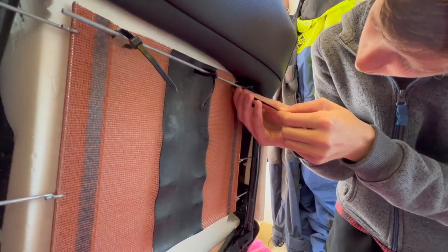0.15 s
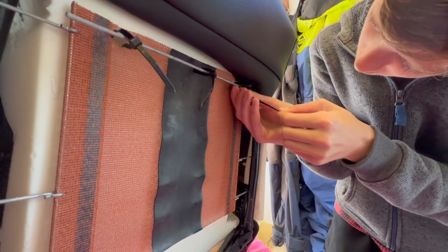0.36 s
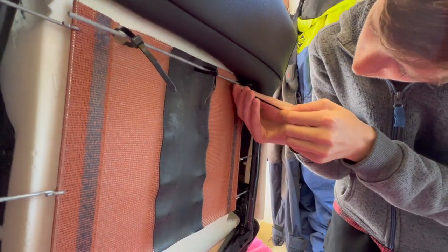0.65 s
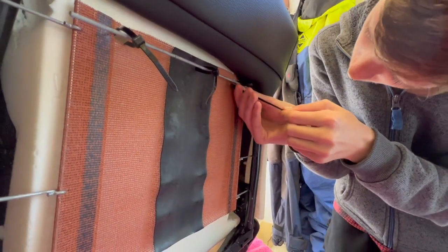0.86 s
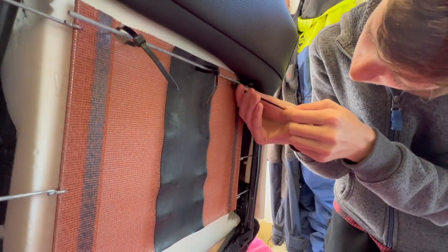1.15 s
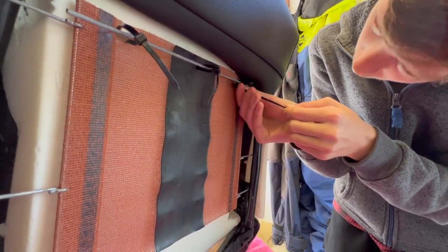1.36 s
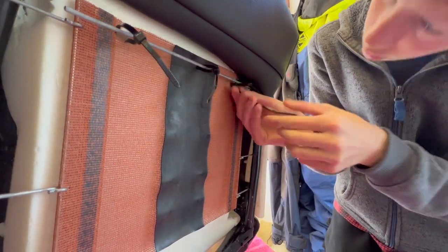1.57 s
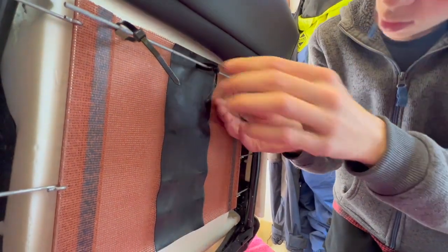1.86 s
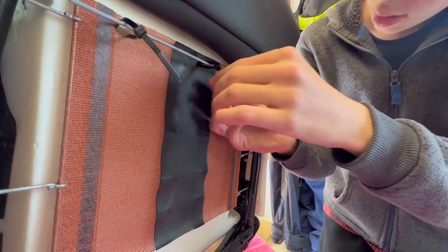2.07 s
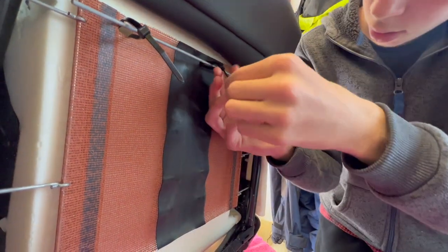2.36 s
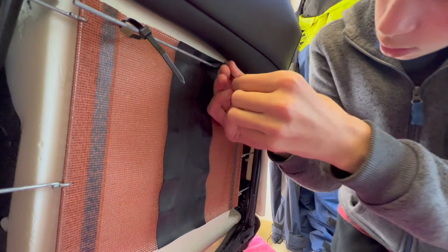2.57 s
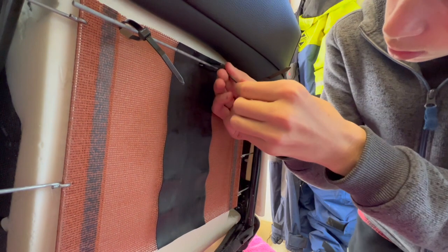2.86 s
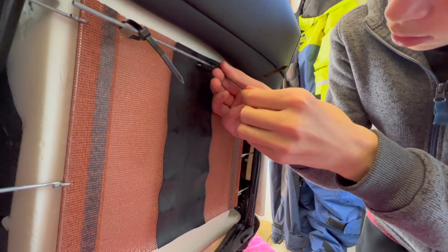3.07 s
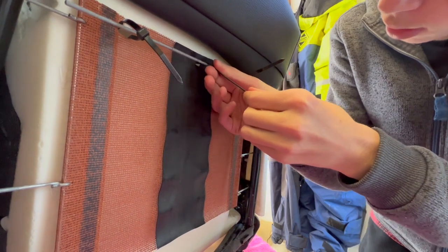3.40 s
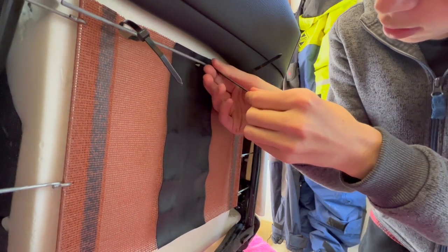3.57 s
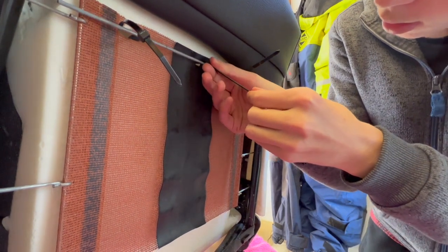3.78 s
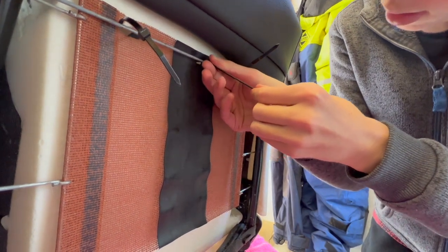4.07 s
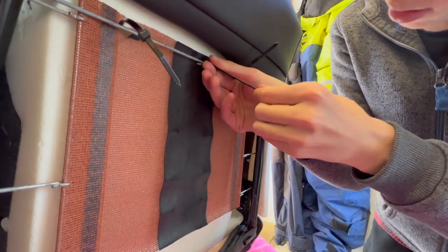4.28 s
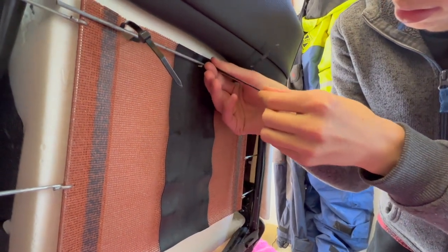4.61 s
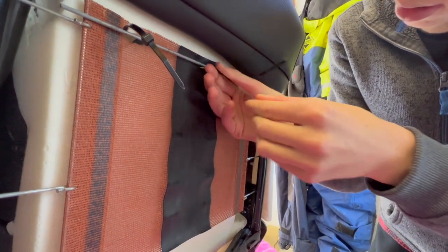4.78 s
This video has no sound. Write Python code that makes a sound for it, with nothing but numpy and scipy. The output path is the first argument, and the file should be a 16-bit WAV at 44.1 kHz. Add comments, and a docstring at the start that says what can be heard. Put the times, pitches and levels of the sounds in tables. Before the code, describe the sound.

Inside a small, short-echoing vehicle cabin, a phone close to the hands hears a nylon cable tie tighten on a seat frame. Low rumble is strongest at the start, then drops under faint hiss. Quick bursts of sharp, bright plastic clicks come at 0.0, 0.16, 0.35 and 0.56 s, each with a small frame knock, followed by single clicks at 0.8, 0.9, 1.0 and 1.2 s. From 1.5 to 2.45 s a hand makes soft thuds and grainy brushes, strongest near 2.0 and 2.4 s. A distant bird whistles faintly and echoes between 1.2 and 3.5 s. A second tie gives four separate clicks from 2.7 s, then a rapid ratcheting run from 2.9 to 3.6 s, fastest near 3.0 s, with a fuzzy squeak early on. It slows into harder, spaced snaps until 4.0 s, fading to tiny clicks by 4.5 s. Light touches and slightly rising rumble finish it.

```python
"""Over a low cabin rumble, short clicking tugs tighten a nylon cable tie on a car seat frame, near a phone.
Each tooth snaps the pawl (an impulse and brief ringing), cracks the strap and knocks the frame's modes.
A hand then brushes the seat (grainy filtered noise) and a far bird whistles (gliding, echoed sines).
A second tie follows: single teeth, a long run that slows as it bites, with a fuzzy squeak, then last teeth."""
import sys
import numpy as np
from scipy import signal
from scipy.fft import rfft, irfft
from scipy.io import wavfile
from scipy.ndimage import uniform_filter1d

SR = 44100
rng = np.random.default_rng(int(sys.argv[2]) if len(sys.argv) > 2 else 0)


def store_pcm(level_fs):
    """Save levels as 16-bit WAV."""
    pcm = np.round(np.clip(level_fs, -1, 1) * 32767).astype(np.int16)
    wavfile.write(sys.argv[1], SR, np.atleast_2d(pcm).T)


N = 218189
SIZE, LEAD = 4096, 256  # samples in one blow, samples before its attack
T = (np.arange(SIZE) - LEAD) / SR  # s from the attack


def amp(db):
    """Decibels to gain."""
    return 10 ** (np.asarray(db) / 20)


def evened(x):
    """Scales to rms 1."""
    return x / np.sqrt(np.mean(x ** 2) + 1e-20)


def blow(x, db):
    """Scales the energy of a short sound to that of 10 ms at rms level db."""
    return amp(db) * evened(x) * np.sqrt(0.01 * SR / SIZE)


def read(points, hz):
    """Reads a spectrum table on a log-frequency axis."""
    f, value = np.transpose(points)
    return np.interp(np.log(hz + 1), np.log(f + 1), value)


def curve(points, t):
    """Reads a control curve at the times t."""
    return np.interp(t, *np.transpose(points))


def bins(x):
    """Frequencies of the spectrum of x, in Hz."""
    return np.fft.rfftfreq(x.shape[-1], 1 / SR)


def colour(x, points):
    """Filters x by a table of (Hz, dB)."""
    return irfft(rfft(x) * amp(read(points, bins(x))), x.shape[-1])


def add(mix, s, sound):
    """Mixes in a blow whose attack falls at s seconds."""
    at = round(s * SR) - LEAD
    part = mix[..., max(at, 0):at + SIZE]
    part += sound[..., max(-at, 0):][..., :part.shape[-1]]


def dying(t60):
    """Envelope of a free decay, t60 in seconds."""
    return (T >= 0) * amp(-60 * abs(T) / t60)


def burst(t60):
    """A puff of dense ringing (decaying noise) with energy 1."""
    x = rng.standard_normal(SIZE) * dying(t60)
    return x / np.linalg.norm(x)


# Left-right likeness of diffuse sound. Each row: frequency in Hz, likeness 0-1.
LIKENESS = [(30, .92), (250, 0.79), (1000, 0.067), (4000, 0.13), (12000, 0.24)]


def diffuse(pair):
    """Makes two unrelated signals alike in the bass, as at two close microphones."""
    a, b = rfft(pair)
    same = np.clip(read(LIKENESS, bins(pair)), 0, 1)
    right = same * a + np.sqrt(1 - same ** 2) * b
    return irfft(np.array([a, right]), pair.shape[-1])


# Spectrum of the background. Each row: frequency in Hz, relative level in dB.
FLOOR_COLOUR = [(20, -4.5), (35, -4), (90, 0), (150, -6), (250, -13.5), (400, -20), (700, -23), (1000, -28),
                (2000, -29.5), (3200, -36), (6000, -40), (9000, -39), (10500, -49), (14500, -37)]
# Level of the rumble. Each row: time in seconds, level in dB before the trim.
RUMBLE_LEVEL = [(0, -46), (.6, -59), (1.6, -59.5), (3.2, -58), (4.4, -57.5), (4.95, -54)]


def background(split_hz=140, rumble_trim_db=2.5, hiss_db=-61.5):
    """Noise: low rumble, strongest in the first tugs, then quiet, rising a little at the end; steady hiss."""
    noise = colour(diffuse(rng.standard_normal((2, N))), FLOOR_COLOUR)
    low = irfft(rfft(noise) / (1 + (bins(noise) / split_hz) ** 8), N)
    rumble = evened(low) * amp(curve(RUMBLE_LEVEL, np.arange(N) / SR) + rumble_trim_db)
    hiss = evened(noise - low) * amp(hiss_db)
    return rumble + hiss


MIC_LEAD_S = 0.000074  # half the delay between the two microphones


def sides(x, right_db=0, lead_s=MIC_LEAD_S):
    """Sound from the hands reaches the right microphone first."""
    lead = np.exp(2j * np.pi * bins(x) * lead_s)
    return irfft(rfft(x) * np.array([1 / lead, lead * amp(right_db)]), SIZE)


def microphones(x, boost_db, hz=8800, width_hz=880):
    """The port of the right microphone rings at one high pitch: a narrow boost."""
    port = amp(boost_db * np.exp(-((bins(x) - hz) / width_hz) ** 4))
    right = irfft(rfft(x[1]) * port, SIZE)
    return sides(np.array([x[0], right]))


def snap(points, ring, ring_t60, scatter=1.0):
    """The pawl lands: one impulse, then brief ringing of the head, a little different at each side."""
    common = burst(ring_t60)
    separate = np.array([burst(ring_t60), burst(ring_t60)])
    pair = (common + scatter * separate) / np.hypot(1, scatter)
    swelling = 1 - dying(ring_t60 / 10)
    return colour((T == 0) + ring * pair * swelling, points)


def varied(points, vary_db=1.0):
    """Each tooth catches the pawl a little differently, which recolours its crack."""
    hz, db = np.transpose(points)
    return np.transpose([hz, db + vary_db * rng.standard_normal(len(hz))])


def knock(modes, detune=0.031, muddle=0.5, bass_db=0, bass_hz=400, vary_db=1.0):
    """Damped modes struck by a tooth; the gripping fingers shift them slightly."""
    hz, db, t60 = np.transpose(modes)[:, :, None]
    turn = 2 * np.pi * hz * (1 + detune * rng.standard_normal(hz.shape)) * T
    level_db = db + bass_db * (hz < bass_hz) + vary_db * rng.standard_normal(hz.shape)
    rings = amp(level_db) * dying(t60) * np.exp(1j * turn)
    # alternate signs, then a random phase for each mode and side
    signs = (-1) ** np.arange(len(modes))
    heard = signs * np.exp(1j * muddle * rng.standard_normal((2, len(modes))))
    return (heard[:, :, None] * rings).sum(1).imag * (1 - dying(0.016))


def tension(tooth, fit):
    """The strap takes up its slack, then tightens with every tooth until taut; limited to 0-1."""
    slack_teeth, biting_teeth, loose, taut = fit
    bite = np.clip((tooth - slack_teeth) / biting_teeth, 0, 1)
    return np.clip(loose + (taut - loose) * bite, 0, 1)


# Tugs on the first tie. Each row: start in seconds, length in seconds, number of teeth,
# mean snap level in dB, knock level in dB.
FIRST_TUGS = [(0.0078, 0.0237, 3, -22, -31.5), (0.1561, 0.1143, 8, -21, -35.5),
              (0.3548, 0.0799, 4, -19.5, -35), (0.5606, 0.0473, 3, -22, -38.5), (0.7901, 0, 1, -23.5, -46),
              (0.8906, 0, 1, -25.5, -46), (0.9934, 0, 1, -23, -44.5), (1.1826, 0, 1, -25, -46.5)]
TUG_PEAK, TUG_EASE = 0.417, 1.58  # share of the way where a tug is fastest, slowing towards its ends


def first_teeth():
    """Every tug gathers speed and stalls again; one row a tooth: (s, snap dB, knock dB)."""
    rows = []
    for start, length, teeth, snap_db, knock_db in FIRST_TUGS:
        way = np.linspace(0, 1, round(teeth))
        lag = way + TUG_EASE * ((way - TUG_PEAK) ** 3 + TUG_PEAK ** 3)
        times = start + length * lag / max(lag[-1], 1)
        rows += [(s, snap_db, knock_db) for s in times]
    return rows


# Colour of the first pawl's snap. Each row: frequency in Hz, relative level in dB.
FIRST_SNAP_COLOUR = [(3000, -28), (6000, -12), (7500, -8.5), (8700, 2.5), (10300, -3), (11000, -17),
                     (12000, 3), (13200, -14.5), (14400, 3), (15600, -6), (16500, -21)]
# Colour of the first strap's crack. Each row: frequency in Hz, relative level in dB.
FIRST_CRACK_COLOUR = [(200, -13.5), (700, -4.5), (1050, 11), (1500, -17.5), (1850, 1), (2200, 14),
                      (3000, -2.5), (4000, 4.5), (5000, -9), (8000, -35.5)]
# Modes of the first strap when taut. Each row: frequency in Hz, relative level in dB, t60 in seconds.
STRAP_MODES = [(1533, 7, 0.0075), (2103, -9.5, 0.011)]
# Modes of the frame at the first tie. Each row: frequency in Hz, relative level in dB, t60 in seconds.
FIRST_FRAME_MODES = [(92, -2, 0.1), (160.8, -4.5, .11), (214, 1, 0.09), (293.5, 4.5, .065),
                     (393, -5.5, 0.023), (486, -1, 0.058), (580, 7, 0.02), (676, 8, 0.031), (832, 0, 0.02)]
# Tightening of the first tie: teeth of slack, further teeth until taut, then slack and taut tension
# before the 0-1 limit.
FIRST_TIGHTENING = (19, 2.1, 0.59, 1.7)


def first_tie(crack_db=-39.0, ring_db=-39.0, slack_ring_db=-15.5, taut_crack_db=-0.5,
              uneven_db=1.03, taut_treble_db=8, knock_delay_s=0.0017):
    """Short tugs on a tie whose head rings freely; once taut, snap brightens and strap rings more."""
    out = np.zeros((2, N))
    for tooth, (s, snap_db, knock_db) in enumerate(first_teeth()):
        pull = tension(tooth, FIRST_TIGHTENING)
        treble_db = (pull - 0.5) * taut_treble_db
        head = snap(FIRST_SNAP_COLOUR, ring=1.0, ring_t60=0.0033)
        head = colour(head, [(9600, 0), (10800, treble_db), (13000, treble_db), (15000, 0)])
        click = microphones(head, boost_db=12.5)
        add(out, s, blow(click, snap_db + uneven_db * rng.standard_normal()))
        crack = sides(snap(varied(FIRST_CRACK_COLOUR), ring=4.8, ring_t60=0.015), right_db=1.5)
        add(out, s, blow(crack, crack_db + pull * taut_crack_db))
        strap = sides(knock(STRAP_MODES, muddle=0.2, vary_db=5.7), right_db=4, lead_s=0.00004)
        add(out, s, blow(strap, ring_db + (1 - pull) * slack_ring_db))
        frame = knock(FIRST_FRAME_MODES, detune=0.047)
        add(out, s + knock_delay_s, blow(frame, knock_db))
    return out


# Decay of the cabin. Each row: frequency in Hz, t60 in seconds.
CABIN_DECAY = [(150, 0.26), (400, 0.2), (1000, 0.22), (3000, 0.17), (9000, 0.19), (15000, 0.19)]


def cabin(x, wet, first_echo_s=0.0018, early=0.57):
    """Roof and windows answer within a few milliseconds; the upholstery soon swallows the tail."""
    noise = diffuse(rng.standard_normal((2, SR // 2)))
    hz, t, z = signal.stft(noise, SR, nperseg=128)
    t60 = read(CABIN_DECAY, hz)[:, None]
    decay = amp(-60 * t / t60) * np.sqrt(2 * np.log(1000) / (t60 * SR))  # about energy 1 per band
    send = amp(read(wet, hz))[:, None]
    tail = signal.istft(z * decay * send, SR, nperseg=128)[1]
    t = np.arange(tail.shape[1]) / SR
    early_bump = early * np.exp(-((t - 0.0095) / 0.0066) ** 2)
    tail = tail * (np.minimum(t / first_echo_s, 1) + early_bump)
    return signal.fftconvolve(x, tail, axes=1)[:, :N]


STROKE_RISE_DB, STROKE_FADE_DB_PER_S = 35.5, 229


def stroke(s, rise_s, hold_s):
    """Envelope of a sliding touch: it swells until s, holds and fades."""
    t = np.arange(N) / SR - s
    swell_db = STROKE_RISE_DB * np.minimum(t / rise_s, 0)
    fade_db = STROKE_FADE_DB_PER_S * np.maximum(t - hold_s, 0)
    return amp(swell_db - fade_db)


# Colour of the rubbing. Each row: frequency in Hz, relative level in dB.
RUBBING_COLOUR = [(120, -6), (250, -2.5), (480, -8), (750, -8), (980, -7), (1350, -9.5), (2300, -7.5),
                  (3500, -10), (6000, -11.5), (8600, -9.5), (10700, -20.5), (13200, -12), (16000, -32)]
# Strokes over seat and strap. Each row: end of the rise in seconds, rise in seconds, hold in seconds,
# level in dB before the trim, boost of the fabric's scuff in dB.
HAND_STROKES = [(1.745, 0.27, 0.18, -59.5, 1.5), (1.969, 0.023, 0.028, -41.5, 9),
                (2.209, 0.12, 0.036, -52, 5.5), (2.392, 0.016, 0.021, -41, -2.5),
                (4.668, 0.025, 0.012, -68.5, 14), (4.944, 0.12, 0.02, -58, -8)]
# Fingers and the loose tail tap the seat. Each row: time in seconds, thud level in dB, tick level in dB,
# treble tilt of the tick in dB.
SEAT_TAPS = [(0.059, -58, -37.5, -2.5), (1.517, -48.5, -70, 9), (1.553, -53.5, -67, 4),
             (1.63, -78.5, -63.5, 7), (1.664, -57.5, -56.5, -15), (2.087, -52.5, -77, 0),
             (2.2265, -43, -43.5, 8), (2.432, -44, -75, 0), (4.672, -68, -61, 3), (4.879, -53.5, -60, 7.5)]


def hands(grain_db=1.5, catch_db=1.5, rub_trim_db=-1, scuff_hz=930, scuff_width_hz=160):
    """Grainy rubbing of skin and sleeve that catches and slips, and a few soft taps."""
    grains = evened(uniform_filter1d(rng.standard_normal(N), size=90))
    catches = evened(uniform_filter1d(rng.standard_normal(N), size=600))
    rough = diffuse(rng.standard_normal((2, N))) * amp(grain_db * grains + catch_db * catches)
    rub = evened(colour(rough, RUBBING_COLOUR))
    scuff = irfft(rfft(rub) * np.exp(-((bins(rub) - scuff_hz) / scuff_width_hz) ** 2), N)
    out = np.zeros((2, N))
    for s, rise_s, hold_s, db, scuff_db in HAND_STROKES:
        brush = rub + (amp(scuff_db) - 1) * scuff
        out += brush * amp(db + rub_trim_db) * stroke(s, rise_s, hold_s)
    for s, thud_db, tick_db, treble_db in SEAT_TAPS:
        thud = colour(burst(0.088), [(50, -22), (130, -6.0), (230, 0.0), (400, -10.5), (700, -13.5),
                                     (2000, -29.5), (8000, -86.5)])
        add(out, s, blow(thud, thud_db))
        tick = snap([(300, 1.5), (2000, 6), (4500, -11.0), (9000, -3.5), (15000, -17.5)],
                    ring=4.3, ring_t60=0.022)
        add(out, s, blow(colour(tick, [(2500, 0), (5000, treble_db)]), tick_db))
    return out


# Notes of the bird. Each row: start in seconds, end in seconds, first Hz, last Hz,
# level in dB before trim and echo.
BIRD_NOTES = [(1.222, 1.26, 1920, 1863, -73), (1.372, 1.436, 3030, 2210, -82.5),
              (1.398, 1.552, 2184, 2100, -70.5), (1.55, 1.656, 1695, 2043, -76.5),
              (1.615, 1.816, 2192, 2760, -75), (1.728, 1.822, 2012, 1910, -68.5),
              (1.892, 1.982, 2640, 2410, -77), (2.025, 2.082, 2064, 1875, -65.5),
              (2.325, 2.41, 2070, 2360, -71), (2.435, 2.562, 2170, 1886, -71.5),
              (2.539, 2.599, 2140, 2366, -70.5), (2.58, 2.695, 1920, 1667, -74.5),
              (2.71, 2.97, 2740, 2777, -74), (3.385, 3.563, 1736, 2140, -73.5)]


def bird(waver=0.015, trim_db=-1, yard_t60=0.26):
    """Gliding whistles from far outside, smeared by the echoes of the yard."""
    song = np.zeros(N)
    for start, end, first_hz, last_hz, db in BIRD_NOTES:
        count = max(int((end - start) * SR), LEAD)
        wobble = evened(uniform_filter1d(rng.standard_normal(count), size=150))
        hz = np.geomspace(first_hz, last_hz, count) * (1 + waver * wobble)
        whistle = np.sin(2 * np.pi * np.cumsum(hz) / SR) * signal.windows.tukey(count, 0.4)
        song[int(start * SR):][:count] += amp(db + trim_db) * evened(whistle)
    echoed = []
    for side in range(2):
        yard = 2.25 * (T == 0) + 2.8 * burst(yard_t60)
        echoed.append(signal.fftconvolve(song, yard)[LEAD:LEAD + N])
    return np.array(echoed)


# Speed of the long pull on the second tie. Each row: time in seconds, teeth per second.
LONG_PULL_SPEED = [(2.8755, 33.2), (2.942, 91.9), (2.986, 110.4), (3.021, 95), (3.075, 43.3), (3.164, 40.1),
                   (3.221, 49.3), (3.245, 40.2), (3.383, 27.1), (3.389, 31.7), (3.559, 27.9), (3.64, 18.9)]
# Force of that pull. Each row: time in seconds, snap level in dB, crack level in dB before the trim.
LONG_PULL_FORCE = [(2.88, -20.5, -46.8), (3.0, -20, -46), (3.17, -20.5, -43), (3.22, -18.5, -46),
                   (3.36, -19.5, -42.5), (3.52, -17.5, -41), (3.63, -15.5, -38.5)]
# Teeth before and after the long pull. Each row: time in seconds, snap level in dB,
# crack level in dB before the trim.
LONE_TEETH = [(2.6965, -21.5, -41), (2.7372, -19.5, -37.5), (2.7785, -20.5, -46.5), (2.8342, -21, -53.5),
              (3.7023, -18.5, -41), (3.764, -16.5, -40), (3.8243, -20.5, -48.5), (3.898, -19.5, -46),
              (3.9668, -18.5, -46.5), (4.0481, -23.9, -50), (4.1439, -27.5, -53), (4.2209, -31, -53.5),
              (4.3074, -32, -53.5), (4.3712, -31, -53.5), (4.43, -37.7, -53.5), (4.5111, -37.5, -52.5)]


def second_teeth():
    """The long pull passes teeth at its speed, between the single ones; rows (s, snap dB, crack dB)."""
    t = np.arange(LONG_PULL_SPEED[0][0], LONG_PULL_SPEED[-1][0], 1 / SR)
    travel = np.cumsum(curve(LONG_PULL_SPEED, t)) / SR  # teeth passed
    s = np.interp(np.arange(travel[-1]), travel, t)
    at, snap_db, crack_db = np.transpose(LONG_PULL_FORCE)
    run = list(zip(s, np.interp(s, at, snap_db), np.interp(s, at, crack_db)))
    return sorted(LONE_TEETH + run)


# Colour of the second pawl's snap, strap slack. Each row: frequency in Hz, relative level in dB.
SLACK_SNAP_COLOUR = [(3000, -76.5), (7000, -18), (8700, -10), (10700, 1), (11900, 5.5), (13000, 5),
                     (14500, 1), (15600, -2), (16600, -10)]
# The same, strap taut. Each row: frequency in Hz, relative level in dB.
TAUT_SNAP_COLOUR = [(3000, -17), (8000, -27), (10500, -8.5), (11500, -5.5), (12600, 9), (13800, 3.5),
                    (15000, -5), (16000, -4), (16600, -27)]
# Colour of the second strap's crack. Each row: frequency in Hz, relative level in dB.
SECOND_CRACK_COLOUR = [(200, -8), (800, 11), (1250, 5), (1600, 8), (2300, 6.5), (3300, 4), (4300, 5.5),
                       (6000, 11.5), (9000, 2)]
# Modes of the frame at the second tie. Each row: frequency in Hz, relative level in dB, t60 in seconds.
SECOND_FRAME_MODES = [(117, -4.5, 0.031), (178.6, -4.5, 0.053), (236, 0, 0.029), (328.6, -3, 0.027),
                      (425, -2, 0.023), (628, 7.5, 0.013), (778, 5, 0.009), (898, -9, 0.02)]
# Tightening of the second tie: teeth of slack, further teeth until taut, slack tension, taut tension.
SECOND_TIGHTENING = (5.5, 32, 0.02, 0.68)


def second_tie(crack_trim_db=-1, knock_db=-49, taut_knock_db=7.5, port_db=5, slack_port_db=9,
               slack_bass_db=-10, bass_hz=520, uneven_db=0.9, soft_below_db=-28, dulling=0.57):
    """Tightening shortens and narrows the snap and loads the frame; soft blows shift the knock's bass."""
    out = np.zeros((2, N))
    hz = np.fft.rfftfreq(LEAD, 1 / SR)
    for tooth, (s, snap_db, crack_db) in enumerate(second_teeth()):
        slack = 1 - tension(tooth, SECOND_TIGHTENING)
        shifted_hz = hz * (1 + 0.0033 * rng.standard_normal())
        shade_db = slack * read(SLACK_SNAP_COLOUR, hz) + (1 - slack) * read(TAUT_SNAP_COLOUR, hz)
        shade = np.transpose([shifted_hz, shade_db])
        head = snap(shade, ring=0.32 + 0.35 * slack, ring_t60=0.0055, scatter=0.35)
        click = microphones(head, boost_db=port_db + slack * slack_port_db)
        add(out, s, blow(click, snap_db))
        crack = snap(varied(SECOND_CRACK_COLOUR), ring=2.1, ring_t60=0.01)
        crack = sides(crack, right_db=-2, lead_s=MIC_LEAD_S * slack ** 3)
        add(out, s, blow(crack, crack_db + crack_trim_db))
        bass_db = slack ** 2 * slack_bass_db + dulling * max(soft_below_db - snap_db, 0)
        frame = knock(SECOND_FRAME_MODES, detune=0.067, bass_db=bass_db, bass_hz=bass_hz, vary_db=2.5)
        frame_db = knock_db + (1 - slack) * taut_knock_db + uneven_db * rng.standard_normal()
        add(out, s, blow(frame, frame_db))
    return out


def scrape(width_hz=260, rest_hz=2130, hz_per_speed=2.8, scrape_db=-56, pulse_db=4):
    """A fuzzy squeak: friction in one resonance that rises with the speed and pulses with each tooth."""
    speed = curve(LONG_PULL_SPEED, np.arange(N) / SR)
    pulses = amp(pulse_db * np.cos(2 * np.pi * np.cumsum(speed) / SR))
    noise = rng.standard_normal((2, N)) + 1j * rng.standard_normal((2, N))
    r = np.exp(-np.pi * width_hz / SR)
    fuzz = signal.lfilter([1], np.poly([r, r]), pulses * noise)
    # shift the fuzz up to the moving resonance
    turn = 2 * np.pi * np.cumsum(rest_hz + hz_per_speed * speed) / SR
    squeak = (fuzz * np.exp(1j * turn)).real
    return amp(scrape_db) * stroke(2.91, rise_s=0.071, hold_s=0.28) * evened(squeak)


# Send of the first tie into the cabin. Each row: frequency in Hz, send in dB.
FIRST_SEND = [(150, -13), (500, -2.5), (1500, -9.5), (3000, -15.5), (5500, -8.5), (7500, -5.5), (8700, -25),
              (10000, -9), (11000, -15), (12500, -21.5), (14500, -19.5), (16000, -18)]
# Send of the slack second tie and, before their trim, the hands. Each row: frequency in Hz, send in dB.
SLACK_SEND = [(150, 2.5), (500, -9.5), (1500, -2.5), (3000, -14), (5500, -9.5), (7500, -23), (8700, -20),
              (11000, -26.5), (13000, -19), (15000, -15), (16000, -21.5)]
# Send of the taut second tie. Each row: frequency in Hz, send in dB.
TAUT_SEND = [(150, -1.5), (500, -12.5), (1200, -3), (2200, -11.5), (3000, -8), (5500, -14.5), (7500, -7.5),
             (8700, -22), (11500, -26.5), (13000, -30.5), (15000, -34.5), (16000, -26.5)]


def scene(hand_send_trim_db=1.5):
    """Both ties and the hands in the cabin, bird outside; a taut tie's send crossfades to its own colour."""
    first, second, touch = first_tie(), second_tie(), hands()
    pull = [(row[0], tension(tooth, SECOND_TIGHTENING)) for tooth, row in enumerate(second_teeth())]
    taut = curve(pull, np.arange(N) / SR) / pull[-1][1]
    slack_second = np.sqrt(abs(1 - taut ** 2)) * second
    slack_input = slack_second + amp(hand_send_trim_db) * touch
    room = cabin(first, FIRST_SEND) + cabin(slack_input, SLACK_SEND) + cabin(taut * second, TAUT_SEND)
    return first + second + touch + room + scrape() + bird() + background()


def record(dry, edge_hz=16500):
    """Clips at full scale, then limits the band."""
    clipped = np.clip(dry, -1, 1)
    lowpass = signal.firwin(255, edge_hz, window=("kaiser", 8), fs=SR)
    return signal.oaconvolve(clipped, lowpass[None], "same")


dry = scene()
out = record(dry)
store_pcm(out)
```